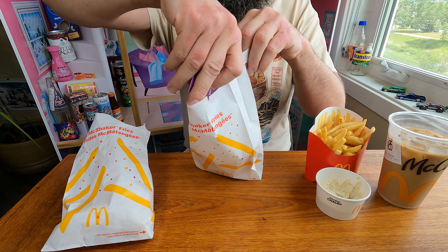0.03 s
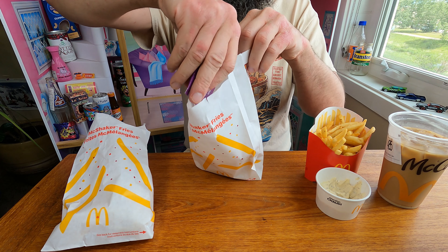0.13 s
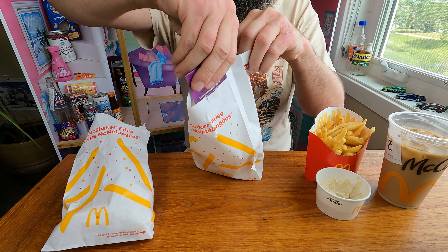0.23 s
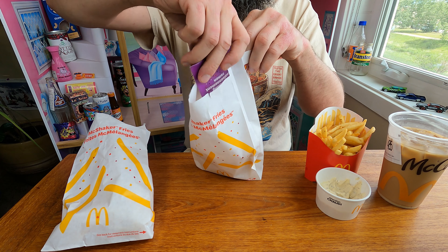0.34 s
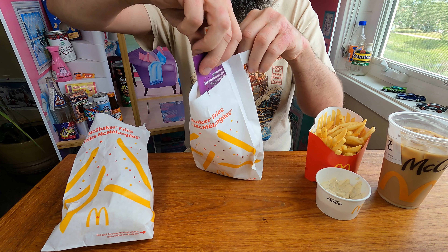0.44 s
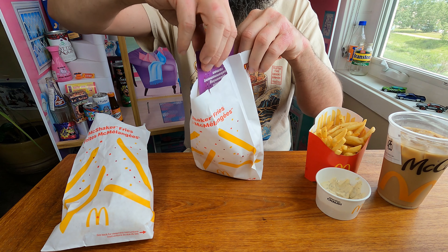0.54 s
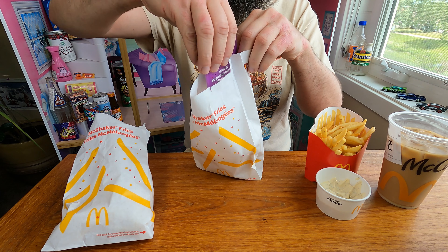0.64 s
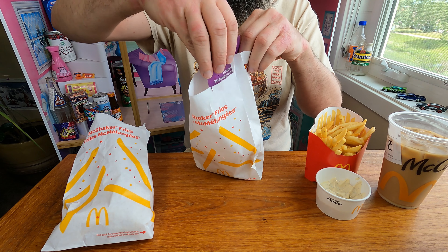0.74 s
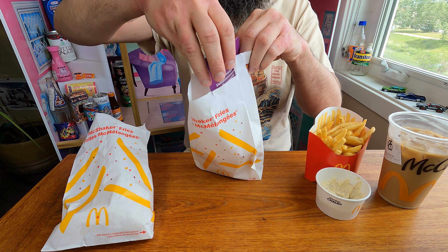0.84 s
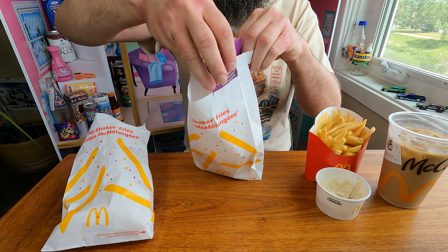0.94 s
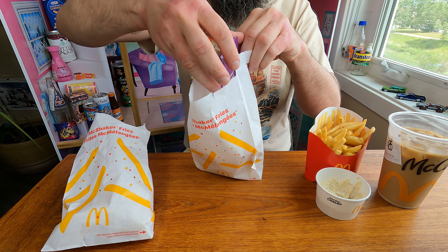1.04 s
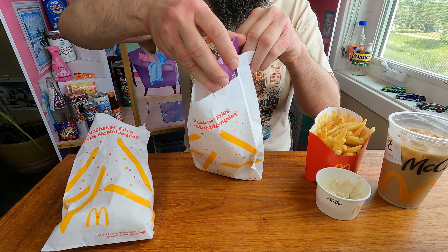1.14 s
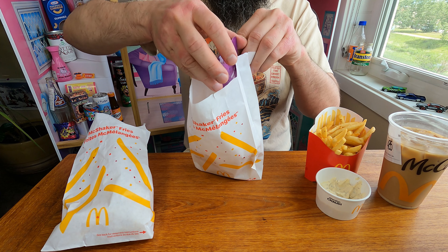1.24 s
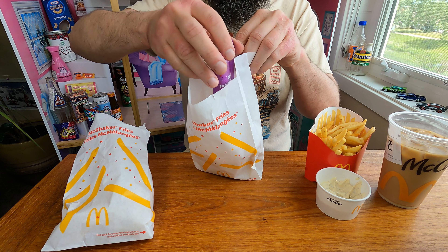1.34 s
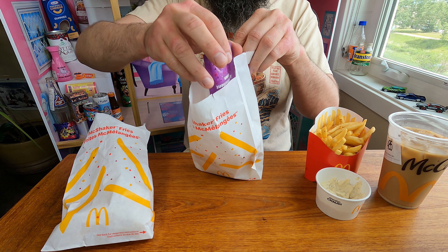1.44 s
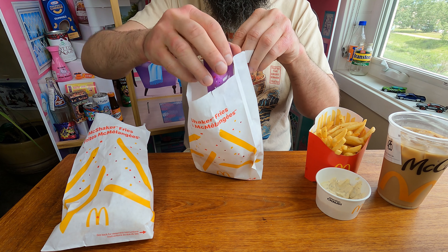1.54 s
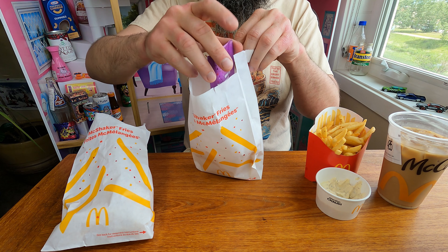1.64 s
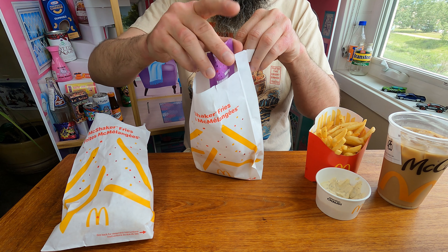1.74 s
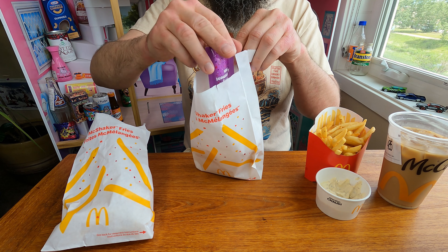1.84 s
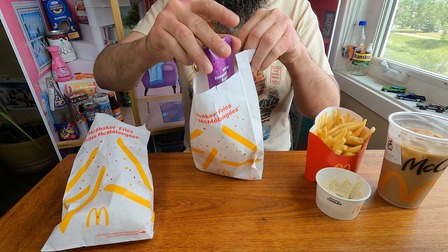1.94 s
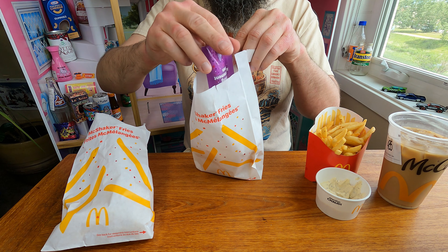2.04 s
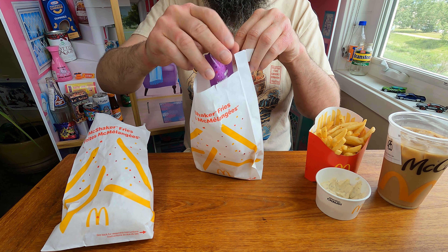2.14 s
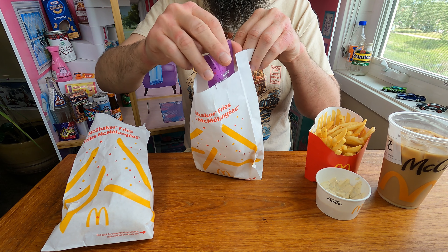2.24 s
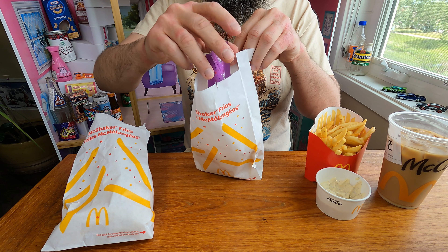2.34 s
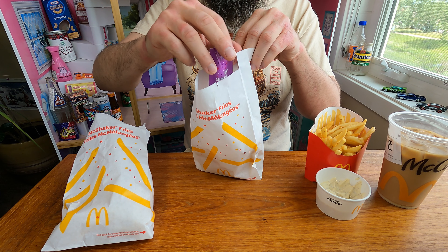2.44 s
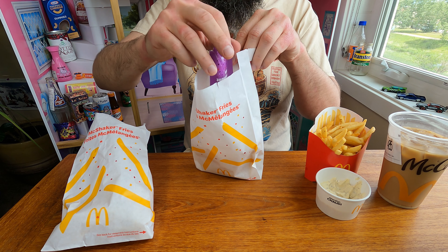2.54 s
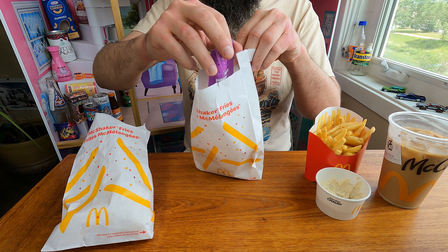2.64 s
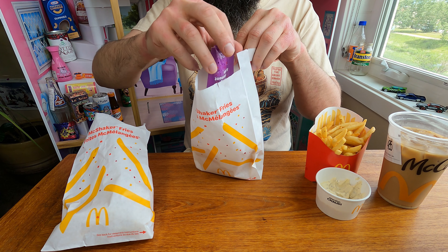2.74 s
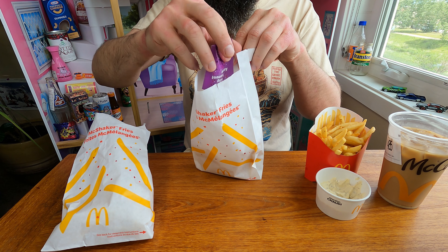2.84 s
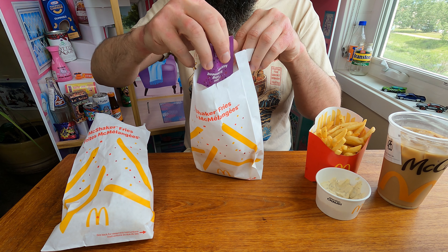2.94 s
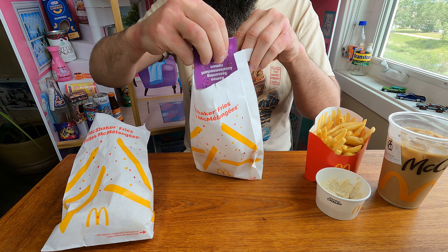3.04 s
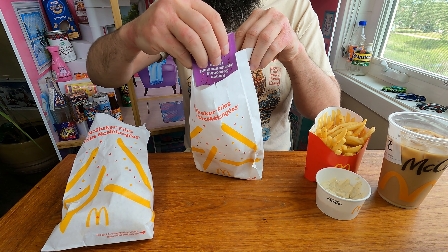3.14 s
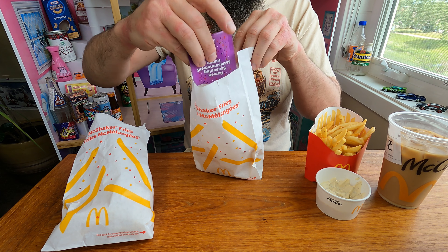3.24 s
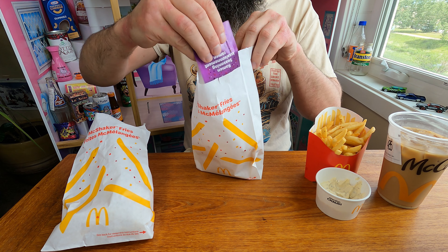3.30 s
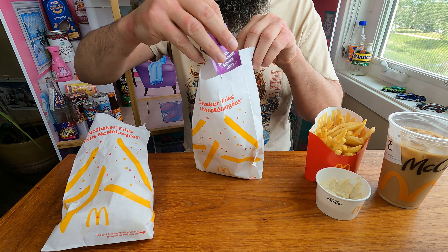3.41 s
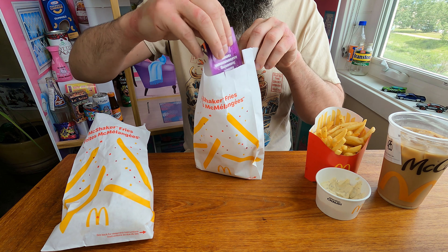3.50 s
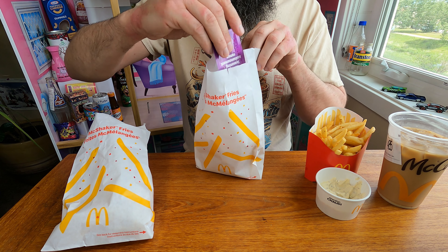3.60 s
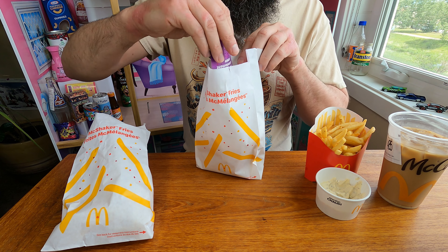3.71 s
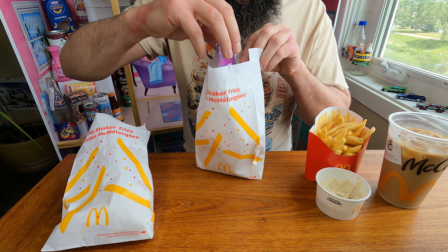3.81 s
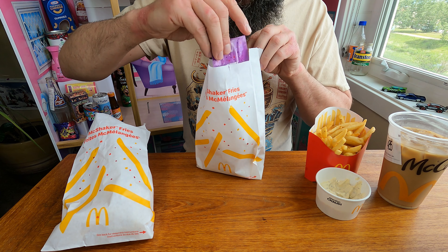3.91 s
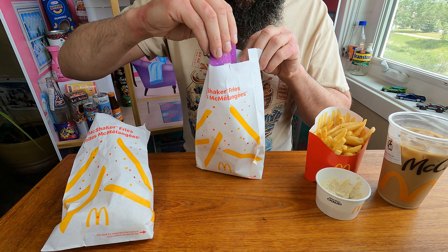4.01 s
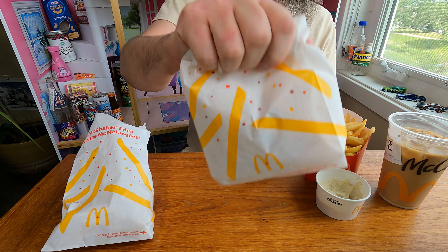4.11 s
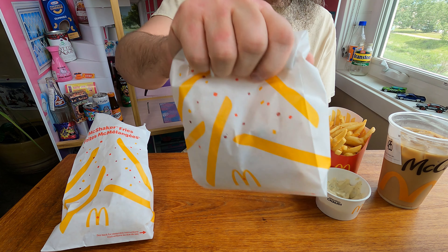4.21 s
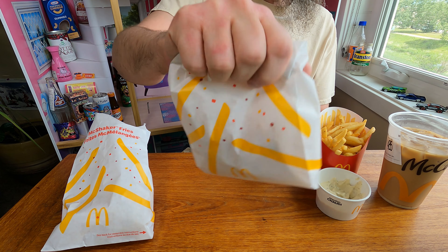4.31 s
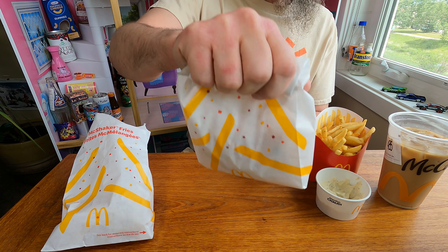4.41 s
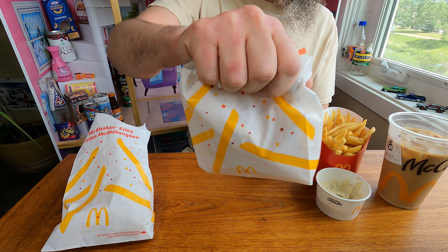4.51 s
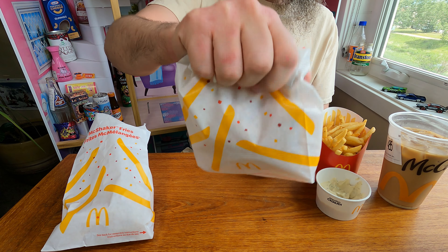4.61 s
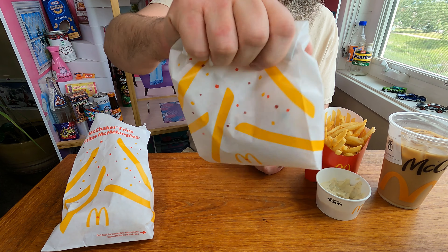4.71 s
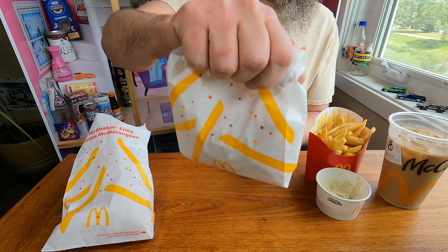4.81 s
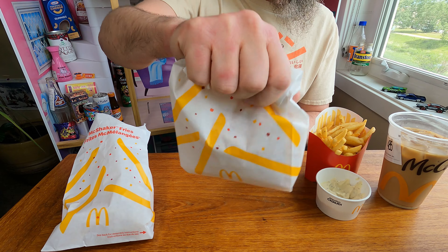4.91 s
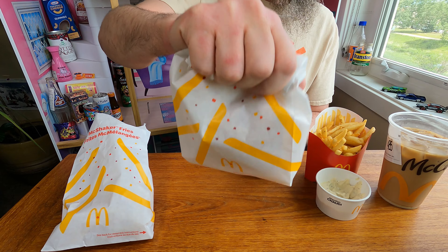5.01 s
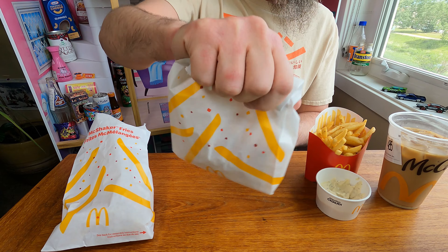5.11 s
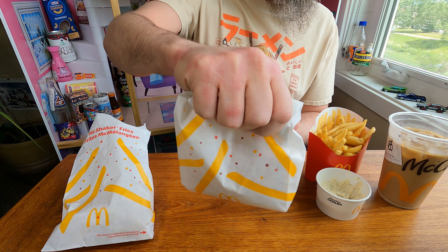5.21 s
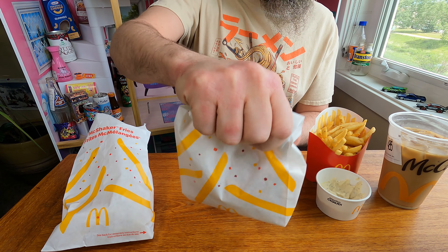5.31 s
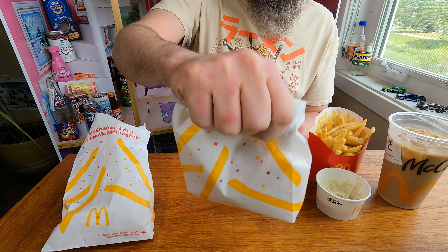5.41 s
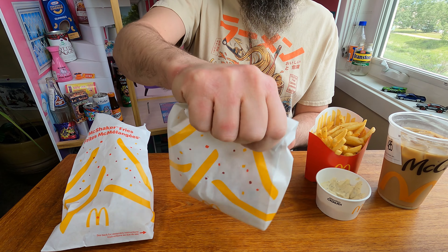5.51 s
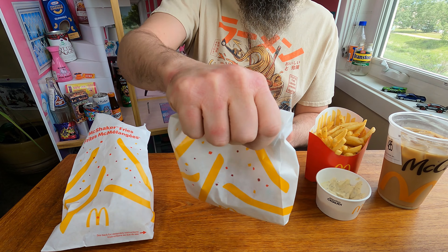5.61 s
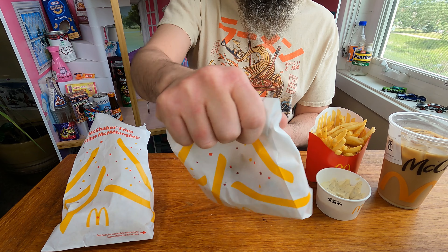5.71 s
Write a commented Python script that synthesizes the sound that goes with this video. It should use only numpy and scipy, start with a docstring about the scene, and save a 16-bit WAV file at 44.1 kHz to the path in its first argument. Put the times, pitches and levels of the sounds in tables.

```python
"""A small room with an appliance humming, a stereo microphone close to a pair of hands.
First the fingers crinkle a paper bag and a small sachet: creases snap one by one over a bed of
small crackles, and the bag booms softly. Around two seconds in the handling thins, then picks up.
From about four seconds the closed bag is shaken and its contents rattle against the paper;
they settle under a few last snaps."""
import sys
import numpy as np
from scipy import signal
from scipy.fft import rfft, irfft, next_fast_len
from scipy.io import wavfile
from scipy.ndimage import uniform_filter1d, map_coordinates

SR = 44100
rng = np.random.default_rng(int(sys.argv[2]) if len(sys.argv) > 2 else 0)


def int16_out(signal):
    """Quantize to a 16-bit WAV file."""
    q = np.round(np.clip(np.atleast_2d(signal).T, -1, 1) * 32767)
    wavfile.write(sys.argv[1], SR, q.astype(np.int16))


N = 253575

# the appliance's motor tones: (frequency [Hz], level against the hum setting [dB])
HUM_TONES = [(58.6, -4.5), (212, -27.5)]
# colour of the room's rumble: (frequency [Hz], level [dB])
RUMBLE_COLOUR = [(20, -24), (40, 13.5), (100, 5), (250, 0), (600, -16.5), (900, -48), (3000, -73)]
# how busily the fingers work: (time [s], crackle level [dB], wall boom against the crackle [dB])
HANDLING_LEVELS = [(0, -37, -6), (.3, -37, -8), (.55, -39.5, -11), (.9, -37, -6.5), (1.17, -40.5, -13.5),
                   (1.54, -43.5, -7), (1.75, -51.5, -1.5), (1.97, -62.5, -24), (2.2, -57.5, -13),
                   (2.32, -44, -8), (2.42, -63, -7), (2.5, -53, -2), (2.93, -58.5, -9.5),
                   (2.98, -40.5, -4.5), (3.3, -38, -5.5), (3.39, -49.5, -4), (3.7, -47.5, -8),
                   (4.06, -49.5, -3.5)]
# broad resonances of the open bag near the table: (frequency [Hz], level [dB])
OPEN_BAG_COLOUR = [(400, -18.5), (700, -10.5), (950, -3), (1500, 1), (2100, -0.5), (2400, -3.5),
                   (3150, 1.5), (3600, -2), (4350, -0.5), (5500, -5.5), (7400, -4.5), (8200, -11),
                   (12300, -18.5), (14300, -30), (15500, -53)]
# colour of the bag's booming walls: (frequency [Hz], level [dB])
WALL_COLOUR = [(29, -22), (50, -1.5), (70, -5), (118, 1), (208, 2), (486, -0.5), (800, -12), (1040, -7),
               (1760, -120)]
# creases that flip: (time [s], level [dB], ring pitch [Hz], tick against the level [dB], length [ms])
CREASE_SNAPS = [(0.0415, -19, 1920.0, -1, 2.3), (0.0737, -30.5, 1260, 0, 7), (0.1185, -14, 3220, -3, 3.1),
                (0.1467, -17.5, 4680, -4.5, 3.9), (0.1696, -20.5, 2180, -10.0, 4.4),
                (0.232, -27, 3140.0, -8.0, 4.6), (0.2602, -18, 4330.0, -9, 1.3),
                (0.2932, -18.5, 3150, -0.5, 1.7), (0.346, -23.5, 1780, -9.0, 7.1),
                (0.5006, -27.0, 1980.0, -14.0, 3), (0.5392, -16, 4640, -8, 0.87),
                (0.5822, -30, 1500, 3.5, 5.3), (0.6262, -18.5, 2110.0, 0.5, 3.3),
                (0.6822, -25, 2520.0, 6.5, 1.6), (0.7441, -24, 1590.0, -14.0, 1.6),
                (0.7563, -23.0, 4280, -4.5, 3.2), (0.8024, -34, 1790.0, 0, 2.4),
                (0.8324, -22.0, 1660.0, -12, 1.6), (0.906, -22.5, 3000, -20, 3.6),
                (0.9628, -26, 3200, -12, 3.7), (0.9724, -16.5, 3140.0, -12, 1.1),
                (1.0239, -15, 2940, -1.5, 1.8), (1.066, -28, 1650, -3, 5.3), (1.0881, -21, 3710, -0.5, 4),
                (1.1145, -25.0, 3940.0, -16.0, 0.95), (1.1284, -32, 1840, -14.0, 2.1),
                (1.2695, -18.5, 4000, -5.5, 0.77), (1.2982, -28, 4300, 3.5, 3.1),
                (1.3703, -27, 4460.0, -5, 3.3), (1.3926, -25, 3530, -9, 1.4),
                (1.4064, -28.0, 4390.0, -1, 1.7), (1.5143, -26.0, 4100, -19.0, 1.6),
                (1.5691, -20.5, 1750, -6, 1.1), (1.5823, -25, 1670, -10, 3.4),
                (1.6066, -33, 3900.0, -4, 1.1), (1.6301, -23.5, 1720.0, -18, 1.1),
                (1.709, -36, 1740.0, -9, 3.8), (1.83, -34.5, 1700.0, -18.0, 1.1),
                (1.8456, -40, 1480, -7, 3), (1.851, -22, 2780, -11, 1.7), (2.0344, -35.5, 2580.0, -4, 3.1),
                (2.159, -39, 1570.0, -10.0, 3.2), (2.1777, -25, 3680, -16, 2), (2.2118, -40, 4200, -4, 5.7),
                (2.218, -35, 1780, -13.0, 2.3), (2.2298, -32, 4330, -8, 1.0),
                (2.4341, -30.0, 2240, -14, 2.7), (2.4448, -30, 2860.0, 1, 1.2),
                (2.4767, -38, 2900, -8, 4.4), (2.4962, -20.5, 1180.0, -24, 0.95),
                (2.5033, -40, 3140.0, 0, 2.8), (2.5102, -26, 1310.0, 6, 1.0),
                (2.5886, -33, 1470, -9.0, 1.6), (2.6114, -24.5, 2890.0, -12.0, 2.2),
                (2.6791, -36.5, 2600, -5, 2.7), (2.7038, -36.5, 3040.0, -1, 2.7),
                (2.728, -44, 3300, 5.5, 2.8), (2.79, -36, 4260, -12, 2), (2.8194, -39.5, 3170.0, -3, 3.9),
                (2.8269, -28, 3720, -4, 0.62), (2.8698, -30, 2520.0, -15, 2.0),
                (2.9725, -19.5, 1760, -15, 1.9), (3.004, -27.5, 1840, -13.0, 1.3),
                (3.0125, -22.5, 2050.0, -7, 2.3), (3.0252, -17.5, 4450, -10, 3.0),
                (3.0319, -13.5, 4400, -15.5, 5.2), (3.0434, -15.5, 1600, -16, 2.3),
                (3.112, -20.5, 2140, -9, 2.8), (3.1202, -19, 2110, 1.5, 1.5),
                (3.193, -27.5, 2210, -11.0, 4.9), (3.2241, -25, 980, -19, 4.1),
                (3.2586, -22, 2540.0, -13, 2.1), (3.2936, -31, 3140, -8.0, 3.6),
                (3.3297, -27.5, 1590, -2, 4.9), (3.4025, -32.5, 4160.0, -11.0, 2.9),
                (3.465, -34, 1530.0, -10.0, 1.2), (3.4753, -36.5, 1460.0, -14, 3.2),
                (3.539, -26, 1650, -17, 1.7), (3.5486, -29, 1380.0, -13.0, 0.77),
                (3.56, -23, 1580, -12.0, 1.1), (3.5683, -20, 2970.0, 3.5, 1.74),
                (3.6374, -35, 2150, -15, 4.4), (3.7158, -27, 3210.0, -7, 2.3),
                (3.7787, -27, 2150, -11.0, 2.8), (3.8495, -26.5, 1880, -9, 3.1),
                (3.8935, -22.0, 3150, -10.0, 2.1), (3.91, -23.5, 2430, -18.0, 2),
                (4.0271, -19, 4500, -5, 2.3), (4.0696, -17, 900.0, -10, 5.5),
                (4.1335, -9, 4350.0, -6.0, 1.5), (4.1895, -13.5, 4660, -2, 1.9),
                (4.2294, -8.5, 4380, -5, 1.5), (5.4621, -12.5, 2170, -11, 3.4),
                (5.5599, -13.5, 1540, -2, 2.8), (5.6458, -19.5, 5120.0, -2, 2.4),
                (5.705, -19, 1660.0, -4, 2.5), (5.7189, -19.5, 1940, -17, 1.5)]
# the small room's decay: (frequency [Hz], time to fall 60 dB [s])
ROOM_DECAY = [(200, 0.23), (2000, 0.077), (10000, 0.034)]
# soft bumps of the whole bag: (time [s], level [dB], pitch [Hz])
BAG_BUMPS = [(0.046, -32.5, 310), (0.173, -35.5, 243), (0.334, -32, 222), (0.402, -27.5, 147),
             (0.41, -34, 497), (0.507, -38.5, 153), (0.623, -40, 202), (0.751, -35.5, 286),
             (0.91, -34.5, 161), (0.989, -47, 86), (1.588, -31, 420), (2.142, -39.5, 124), (3.04, -24, 87),
             (3.046, -34, 250), (3.204, -32, 124), (3.23, -34, 412), (4.074, -30, 780), (4.312, -22.5, 218),
             (4.453, -28, 209), (4.579, -26, 213), (4.887, -22.5, 252), (4.978, -26, 218),
             (5.121, -25.5, 161), (5.286, -26, 151), (5.541, -27, 163)]
# runs of creases giving way, or contents sliding on the paper: (time [s], level [dB], length [s])
RUSTLE_SURGES = [(0.149, -32.5, 0.067), (0.352, -33, 0.19), (0.66, -37, 0.22), (0.851, -34.5, 0.039),
                 (0.962, -37, 0.053), (1.1, -39, 0.05), (1.327, -37.5, 0.086), (1.468, -35, 0.032),
                 (1.586, -30, 0.016), (1.775, -47, 0.029), (1.919, -53.5, 0.023), (2.067, -51, 0.059),
                 (2.112, -51.5, 0.005), (2.232, -48, 0.046), (2.516, -50, 0.058), (2.606, -48, 0.028),
                 (2.701, -53, 0.026), (2.879, -48.5, 0.044), (3.04, -27, 0.035), (3.24, -42, 0.032),
                 (3.578, -41.5, 0.074), (3.882, -48, 0.041), (4.16, -21.5, 0.031), (4.23, -24, 0.031),
                 (4.301, -20.5, 0.087), (4.36, -20, 0.025), (4.398, -19, 0.038), (4.453, -18.5, 0.029),
                 (4.528, -20.5, 0.043), (4.582, -18.5, 0.034), (4.655, -19.5, 0.016), (4.709, -19.5, 0.042),
                 (4.785, -17.5, 0.014), (4.855, -18.5, 0.034), (4.937, -25.5, 0.043), (5.014, -22.5, 0.22),
                 (5.119, -20.5, 0.02), (5.151, -21, 0.0059), (5.222, -21.5, 0.049), (5.304, -22, 0.078),
                 (5.37, -22, 0.044), (5.43, -24, 0.022), (5.486, -21.5, 0.036), (5.535, -21, 0.038),
                 (5.622, -28, 0.077), (5.709, -32.5, 0.022)]
# colour of the closed bag, struck from inside: (frequency [Hz], level [dB])
CLOSED_BAG_COLOUR = [(350, -60), (600, -6.5), (820, -7), (1490, 0), (1760, -4.5), (2040, -1.5), (7240, -8),
                     (8400, -15.5), (12300, -21.5), (14300, -37), (15500, -105)]
# how alike left and right are at the microphone: (frequency [Hz], correlation [0-1])
STEREO_LIKENESS = [(100, 0.95), (600, 0.93), (1400, 0.89), (3100, 0.91), (7000, 0.82), (14000, 0.27)]
# phase between the microphone's two ports: (frequency [Hz], lead of the left port [rad])
PORT_LEAD = [(300, 0), (1500, -.25), (3600, -.8), (4600, -.5), (8400, -.4), (10500, 0)]

HUM_DB, HUM_SHAKEN_DB = -37, -46
CRACK_BELOW_HZ, TICK_BAND_HZ = 5600, (5400, 12600)
THIN_BELOW = 0.39  # a crack has little body below this share of its pitch
RING_WANDER = 0.15  # random phase step of a panel's ring [rad per sample]
AFTER_DB, AFTER_T60_S = -20, 0.075  # crackles after each snap, level against the snap
SKIRT_DB, GATHER_S, TRAIL_S = -6, 0.0057, 0.032  # each surge gathers and trails off at a lower level
PUFF_DB, PUFF_T60_S = 1.5, 0.086  # the walls' puff in a bump, level against its tone
SHAKE_FROM_S, SHAKE_SWELL_S, SHAKE_UNTIL_S = 4.0698, 0.23, 5.552
SHAKE_DB, SHAKE_ONSET_DB, SHAKE_BOOM_DB = -23, -4.5, -11.5  # full rattle; onset and boom against it
SETTLE_DB_PER_S = 118
PEAK_CEILING, TOP_HZ = 0.7, 16000


def amp(db):
    return 10 ** (np.asarray(db) / 20)


def unit_rms(x):
    return x / np.sqrt(np.mean(x ** 2) + 1e-20)


def unit_energy(x):
    return x / np.linalg.norm(x, axis=-1, keepdims=True)


def along(points, hz):
    """Read (frequency, value) points on a log frequency axis."""
    freqs, values = np.transpose(points)
    return np.interp(np.log(hz + 1), np.log(freqs + 1), values)


def wobble(rate):
    """A smooth random curve, rate knots a second."""
    knots = rng.standard_normal(int(N * rate / SR) + 4)
    return map_coordinates(knots, [np.arange(N) * rate / SR])


def filtered(x, response):
    """Filter x by a function of frequency."""
    size = next_fast_len(x.shape[-1] + 8192)
    return irfft(rfft(x, size) * response(np.fft.rfftfreq(size, 1 / SR)), size)[..., :x.shape[-1]]


def coloured(x, colour):
    return filtered(x, lambda hz: amp(along(colour, hz)))


def impulse_response(colour, size=2048):
    """The shortest (minimum-phase) response with this colour."""
    cepstrum = irfft(np.log(amp(along(colour, np.fft.rfftfreq(size, 1 / SR))) + 1e-6))
    cepstrum[1:size // 2] *= 2
    cepstrum[size // 2 + 1:] = 0
    return unit_energy(irfft(np.exp(rfft(cepstrum))))


def spread(pair):
    """Two unrelated signals become left and right, most alike in the bass."""
    turn = lambda hz: np.arccos(np.clip(along(STEREO_LIKENESS, hz), -1, 1)) / 2
    mid, side = filtered(pair, lambda hz: np.array([np.cos(turn(hz)), np.sin(turn(hz))]))
    return np.array([mid + side, mid - side])


def crackle(colour, per_second, spread_db, t60, bed, patchy_db, frame):
    """Tiny uneven bursts over a bed of noise, patchy in colour, the level evened out over 50 ms."""
    t = np.arange(SR // 10) / SR
    starts = rng.random(N) < per_second / SR
    strengths = amp(spread_db * np.minimum(rng.exponential(size=N), 2.5))
    burst_power = signal.fftconvolve(starts * strengths ** 2, amp(-60 * t / t60) ** 2)[:N]
    envelope = np.sqrt(np.abs(burst_power) + bed ** 2)
    spectra = signal.stft(envelope * rng.standard_normal((2, N)), nperseg=frame)[2]
    patches = uniform_filter1d(uniform_filter1d(rng.standard_normal(spectra.shape[1:]), 3, 0), 3, 1)
    patchy = signal.istft(spectra * amp(patchy_db * unit_rms(patches)), nperseg=frame)[1][:, :N]
    paper = coloured(patchy, colour)
    local_power = uniform_filter1d(np.mean(paper ** 2, 0), SR // 20)
    return unit_rms(paper / np.sqrt(np.abs(local_power) + 1e-9))


def appliance_hum(t):
    """A wavering motor hum over the room's rumble; both are fainter once the shaking starts."""
    hum = np.zeros(N)
    for hz, db in HUM_TONES:
        hum += np.sqrt(2) * amp(db + wobble(22.8)) * np.sin(2 * np.pi * hz * t + .1 * wobble(7))
    rumble = unit_rms(coloured(rng.standard_normal((2, N)), RUMBLE_COLOUR))
    level_db = uniform_filter1d(np.where(t < SHAKE_FROM_S, HUM_DB, HUM_SHAKEN_DB) * 1., SR // 40)
    return amp(level_db) * (hum + amp(-13.5) * spread(rumble))


def finger_crinkle():
    """Fingers, close to the microphone, make small creases give way sparsely."""
    return crackle(OPEN_BAG_COLOUR, 600, spread_db=3, t60=0.011, bed=0.93, patchy_db=2.5, frame=128)


def wall_boom():
    """The bag's walls boom as the paper moves."""
    return crackle(WALL_COLOUR, 130, spread_db=3.5, t60=0.018, bed=0.94, patchy_db=2, frame=512)


def rustle_envelope(t, effort_db):
    """The paper follows the hands' effort, with surges and a run of crackles after each snap."""
    flutter_db = np.where(t < SHAKE_FROM_S, 1.7, 0.8) * wobble(32)
    power = amp(effort_db + flutter_db) ** 2
    for at, db, length in RUSTLE_SURGES:
        near = slice(max(round((at - .2) * SR), 0), round((at + .2) * SR))
        age = t[near] - at
        power[near] += amp(db) ** 2 * np.exp(-(3 * age / length) ** 2)
        power[near] += amp(db + SKIRT_DB) ** 2 * np.exp(-2 * np.maximum(-age / GATHER_S, age / TRAIL_S))
    for at, db, *_ in CREASE_SNAPS:
        after = slice(round(at * SR), round(at * SR) + SR // 4)
        power[after] += amp(db + AFTER_DB - 60 * (t[after] - at) / AFTER_T60_S) ** 2
    return np.sqrt(power)


def crease_snaps():
    """A crease flips: a brief crack with a weaker tail, a brighter tick and the nearest panel's ring."""
    cracks, ticks = np.zeros((2, 2, N + SR))
    t = np.arange(SR // 20) / SR
    tail = (1 - np.exp(-t / 0.00023)) * amp(-60 * t / 0.016)
    for at, db, hz, tick_db, length_ms in CREASE_SNAPS:
        crack_noise, tail_noise, tick_noise, phase_noise = rng.standard_normal((4, 2, len(t)))
        rise_s = length_ms / 2450
        pulse = t / rise_s * np.exp(1 - t / rise_s)
        strength = np.linalg.norm(pulse)
        phase = 2 * np.pi * (hz * t + rng.random((2, 1))) + np.cumsum(RING_WANDER * phase_noise, axis=1)
        ring = (pulse + 0.18 * tail) * np.sin(phase)
        crack = strength * (unit_energy(pulse * crack_noise) + 0.32 * unit_energy(ring))
        crack += 1.7 * unit_energy(tail * tail_noise)
        low_cut = signal.butter(1, hz * THIN_BELOW, "high", fs=SR)
        span = slice(round(at * SR), round(at * SR) + len(t))
        cracks[:, span] += amp(db - 4) * signal.lfilter(*low_cut, crack)
        ticks[:, span] += amp(db + tick_db) * strength * unit_energy((pulse + 0.17 * tail) * tick_noise)
    # cracks excite the bag's lower resonances, ticks the upper ones
    lower = signal.lfilter(*signal.butter(3, CRACK_BELOW_HZ, "low", fs=SR), cracks)
    upper = signal.lfilter(*signal.butter(2, TICK_BAND_HZ, "band", fs=SR), ticks)
    return signal.fftconvolve(lower + upper, impulse_response(OPEN_BAG_COLOUR)[None], axes=1)[:, :N]


def room_reverb(direct):
    """The small room answers just after the direct sound, its treble dying first."""
    hz, t, spectra = signal.stft(rng.standard_normal((2, SR // 2)), SR, nperseg=256)
    decay = amp(-60 * t / along(ROOM_DECAY, hz)[:, None])
    tail = signal.istft(spectra * decay, SR, nperseg=256)[1]
    delayed = np.pad(direct, ((0, 0), (150, 0)))  # 3.4 ms
    return signal.fftconvolve(delayed, tail / np.linalg.norm(tail[0]), axes=1)[:, :N]


def bag_bumps():
    """A few soft cycles of the air inside the bag, with a broad puff from its walls."""
    bumps, t = np.zeros(N + SR), np.arange(SR // 10) / SR
    swell = (t / 0.01) ** 2 * np.exp(1.96 * (1 - t / 0.0094))
    for at, db, hz in BAG_BUMPS:
        walls = unit_rms(coloured(rng.standard_normal(len(t)), WALL_COLOUR))
        puff = amp(PUFF_DB - 60 * t / PUFF_T60_S) * (1 - np.exp(-t / .006)) ** 2 * walls
        tone = swell * np.sin(2 * np.pi * (hz * t + rng.random()))
        bumps[round((at - .012) * SR):][:len(t)] += amp(db - 0.5) * (tone + puff)
    return bumps[:N]


def contents_rattle():
    """Tumbling contents strike the closed bag densely."""
    return crackle(CLOSED_BAG_COLOUR, 1800, spread_db=3.5, t60=0.0099, bed=1.11, patchy_db=.5, frame=256)


def shaking_db(t):
    """The shaking swells, holds and stops; the contents settle."""
    swell_db = SHAKE_ONSET_DB * np.clip(1 - (t - SHAKE_FROM_S) / SHAKE_SWELL_S, 0, 1)
    return SHAKE_DB + swell_db - SETTLE_DB_PER_S * np.maximum(t - SHAKE_UNTIL_S, 0)


def scene():
    """Paper up close, crinkled and then shaken; a little room on the snaps, the hum behind."""
    t = np.arange(N) / SR
    crinkling = t < SHAKE_FROM_S
    times, finger_db, wall_db = np.transpose(HANDLING_LEVELS)
    effort_db = np.where(crinkling, np.interp(t, times, finger_db), shaking_db(t))
    boom_db = np.where(crinkling, np.interp(t, times, wall_db), SHAKE_BOOM_DB)
    snaps = crease_snaps()
    envelope = rustle_envelope(t, effort_db)
    crackles = np.where(crinkling, finger_crinkle(), contents_rattle())
    rustle = envelope * (crackles + amp(boom_db) * wall_boom())
    paper = spread(rustle + snaps + amp(-10) * room_reverb(snaps))
    balance = amp([[-.2], [.2]])  # a touch to the right
    return balance * paper + bag_bumps() + appliance_hum(t)


def record(dry):
    """The camera's microphone: two ports a little apart in phase, peaks rounded, top treble cut."""
    ports = filtered(dry, lambda hz: np.exp(.5j * np.outer([1, -1], along(PORT_LEAD, hz))))
    rounded = ports / (1 + np.abs(ports / PEAK_CEILING) ** 3) ** (1 / 3)
    return filtered(rounded, lambda hz: hz < TOP_HZ)


dry = scene()
out = record(dry)
int16_out(out)
```